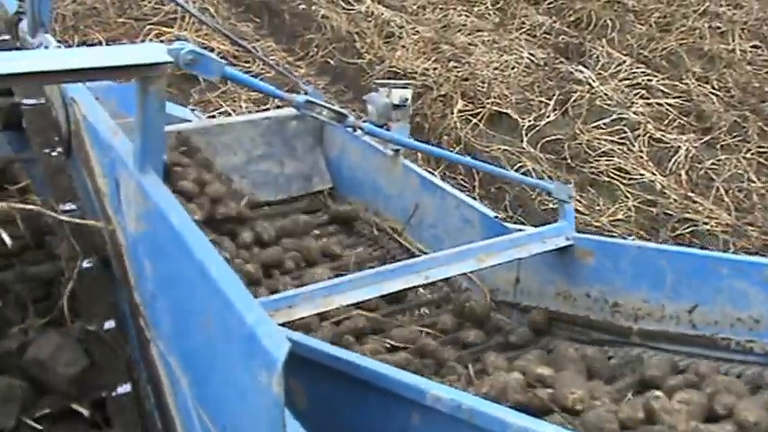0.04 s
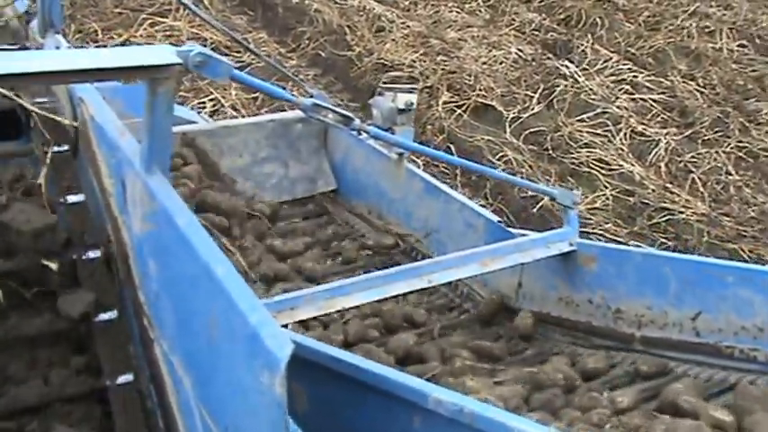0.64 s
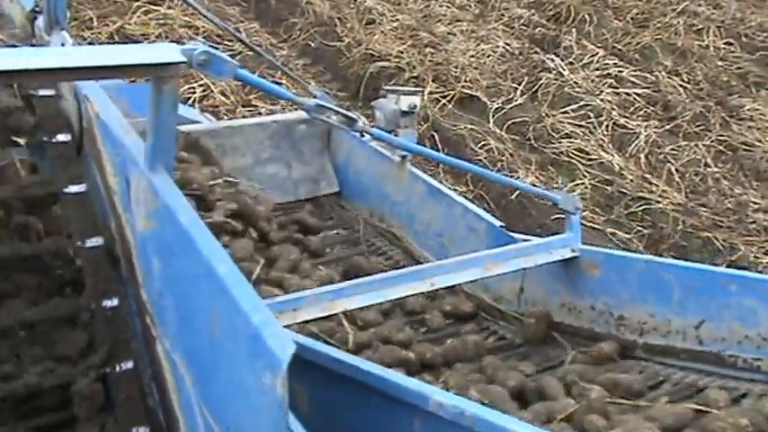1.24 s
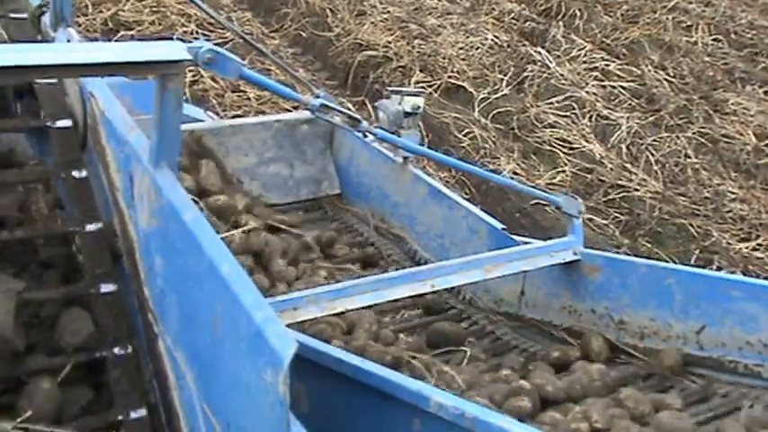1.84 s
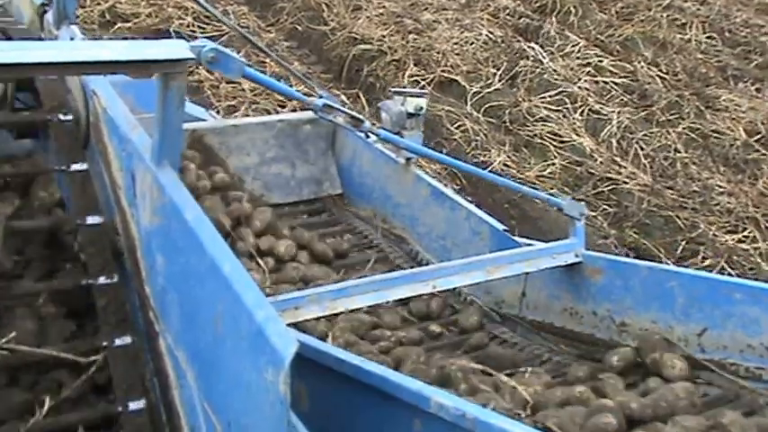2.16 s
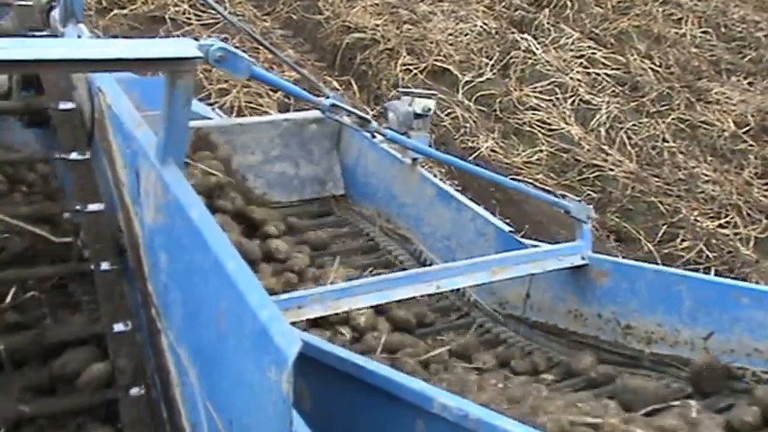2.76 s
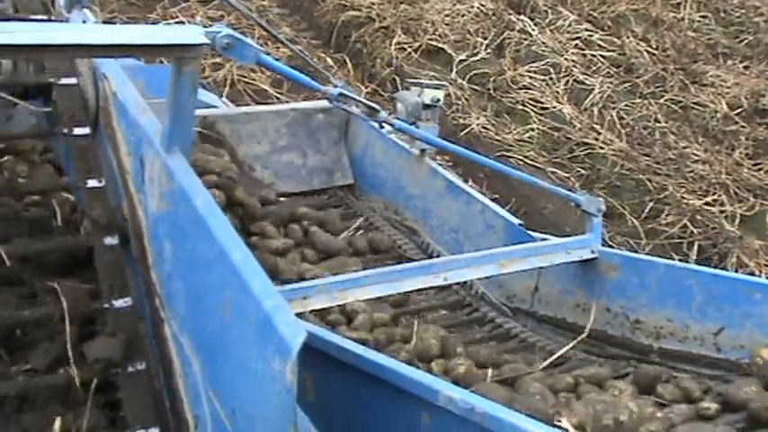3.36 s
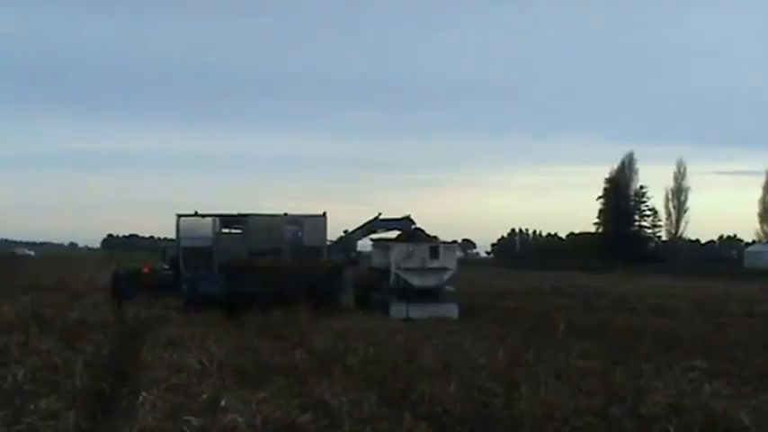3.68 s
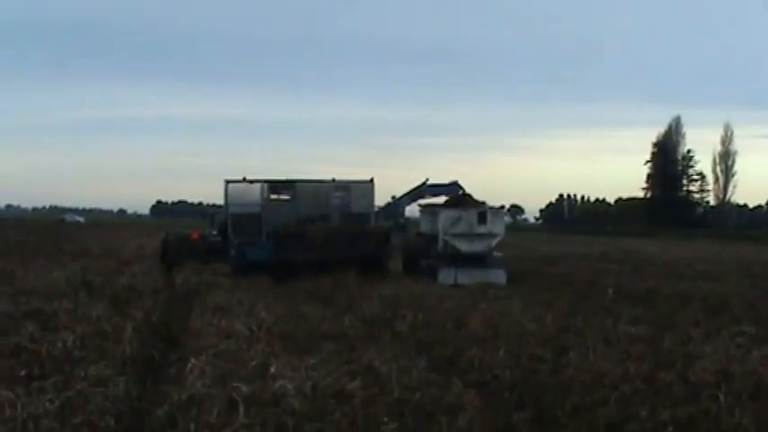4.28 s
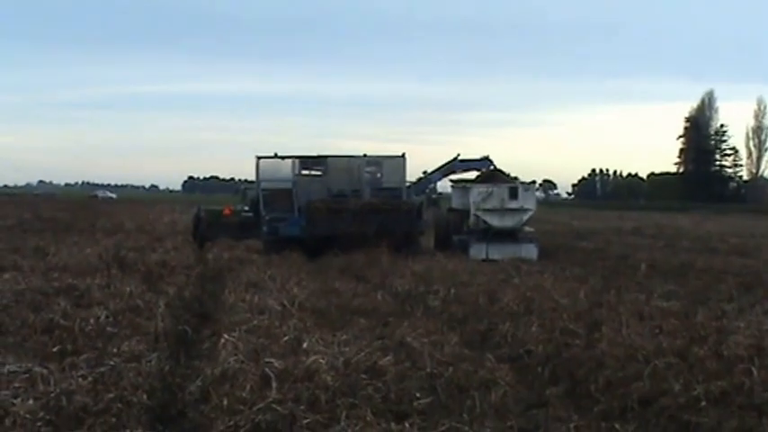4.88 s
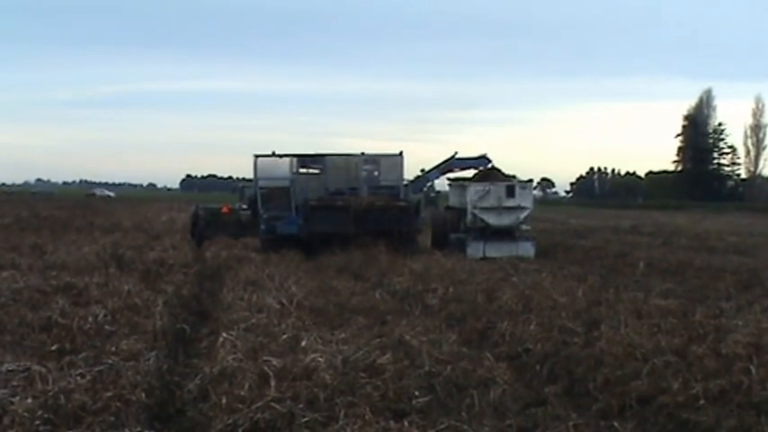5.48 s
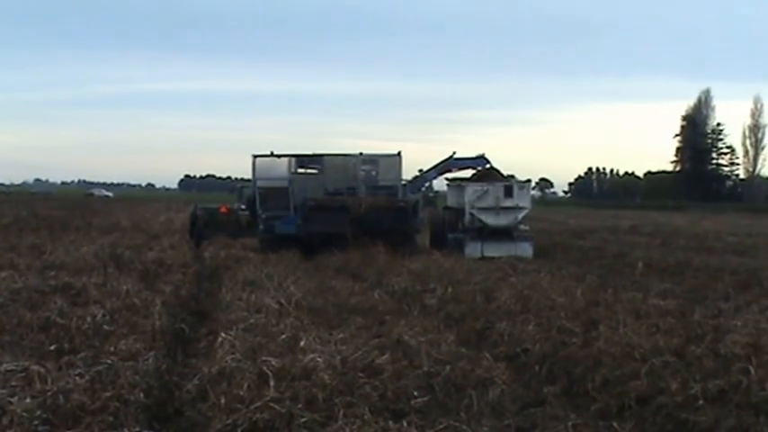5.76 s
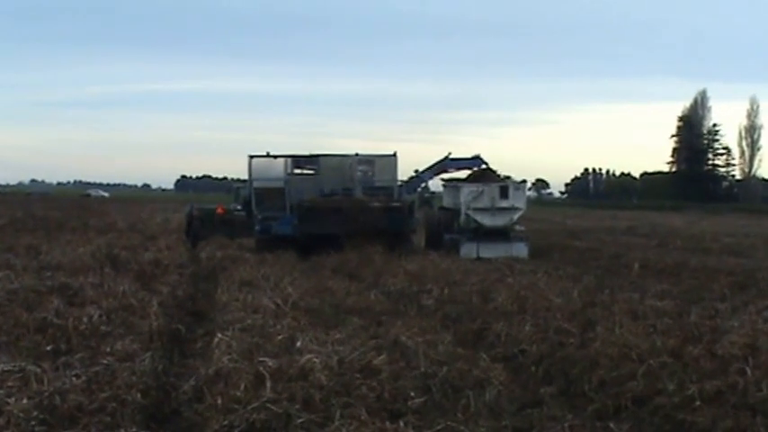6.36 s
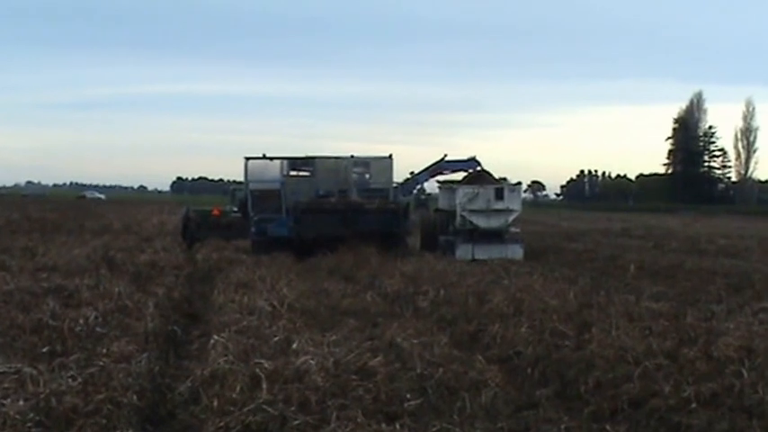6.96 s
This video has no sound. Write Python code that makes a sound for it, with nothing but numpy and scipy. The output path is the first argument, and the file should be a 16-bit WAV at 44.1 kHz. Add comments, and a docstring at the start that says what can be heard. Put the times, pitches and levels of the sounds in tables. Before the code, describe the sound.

A potato harvester works right beside a stereo microphone, its drive humming at a steady pitch while conveyor chains rattle, potatoes and soil tumble and occasional stones ping off metal. This stops abruptly midway, replaced by the far softer drone and clatter of diesel machinery across open farmland. A few thin chirps pass, a second engine sinks in pitch under load, and two small dry ticks sound nearby.

```python
"""A drone and a dense rattle on a potato harvester's deck: the drive sings at multiples of its shaft rate,
two rod chains snap over their sprockets, tubers and clods tumble, and stones ring on steel.
After 3.6 s the scene cuts to the edge of the field: the tractor's exhaust drones far off, a second
engine sinks in pitch under load, and there are a few thin chirps and two small ticks.
A closely spaced stereo microphone hears it all."""
import sys
import numpy as np
from scipy import signal
from scipy.fft import rfft, irfft, next_fast_len
from scipy.io import wavfile
from scipy.ndimage import map_coordinates

SR = 44100
rng = np.random.default_rng(int(sys.argv[2]) if len(sys.argv) > 2 else 0)


def unload_audio(sound):
    """Save the sound as a 16-bit wav file, at the path given as the first command line argument."""
    columns = np.transpose(np.atleast_2d(sound))
    # keep every value between -1 and 1, then stretch to whole-number steps
    steps = np.round(np.clip(columns, -1, 1) * 32767)
    wavfile.write(sys.argv[1], SR, steps.astype(np.int16))


N = 318843
FIRING_HZ = 80.7  # the tractor's engine
# Spectrum of a hard blow on steel: (frequency [Hz], relative density [dB])
STEEL_BLOW = [(1500, -20), (5000, -4), (10000, 3.5), (15000, -4)]


def amp(db):
    """Decibels to amplitude ratio."""
    return 10 ** (np.asarray(db) / 20)


def unit(x):
    """Normalisation to rms 1."""
    return x / np.sqrt(np.mean(x ** 2) + 1e-20)


def along(points, hz):
    """Interpolation of (frequency [Hz], value) points on a logarithmic axis."""
    f, v = np.transpose(points)
    return np.interp(np.log(hz + 1), np.log(f + 1), v)


def envelope(points):
    """Linear interpolation of (time [s], value) points at every sample."""
    return np.interp(np.arange(N) / SR, *np.transpose(points))


def wobble(rate):
    """Smooth random modulation, with rate knots a second."""
    return map_coordinates(rng.standard_normal(int(N * rate / SR) + 4), [np.arange(N) * rate / SR])


def filtered(x, response):
    """Linear filtering: the spectrum of x times a complex frequency response."""
    m = next_fast_len(N + SR // 2)
    return irfft(rfft(x, m) * response(np.fft.rfftfreq(m, 1 / SR)), m)[..., :N]


def noise():
    """Two uncorrelated white noises: the direct and the diffuse part of a sound field."""
    return rng.standard_normal((2, N))


def direct_only(x):
    """A sound field with no diffuse part."""
    return x * [[1], [0]]


def ring(x, modes):
    """Resonance of x in modes of (frequency [Hz], bandwidth [Hz], gain [dB]), at rms 1."""
    response = lambda f: sum(amp(db) * 1j * f * w / (c * c - f * f + 1j * f * w) for c, w, db in modes)
    return unit(filtered(x, response))


def below(f, edge_hz):
    """Power share of the low side of a third-order crossover."""
    return 1 / (1 + (f / edge_hz) ** 6)


def turns(hz):
    """Phase in cycles, the integral of frequency."""
    return np.cumsum(hz) / SR


def bursts(at, scatter_db, t60):
    """Exponentially decaying noise bursts of random size at the given samples, at rms 1."""
    sizes = amp(scatter_db * np.clip(rng.standard_normal(len(at)), -2, 2))
    impacts = np.bincount(at, sizes ** 2, N)[:N]
    power = signal.lfilter([1], [1, -np.exp(-np.log(1e6) / (t60 * SR))], impacts)
    return unit(np.sqrt(power) * noise())


def at_random(rate):
    """A Poisson process: sample numbers of chance contacts, rate a second."""
    return np.flatnonzero(rng.random(N) < rate / SR)


def far_din():
    """Diesel knock and conveyor clatter, dulled by distance, interfere with their ground reflection."""
    # Distant din and open air: (frequency [Hz], relative density [dB])
    din_spectrum = [(200, -20), (290, -10.5), (460, -3), (950, -3.5), (1300, -2), (2000, -3.5),
                    (2550, -9.5), (2800, -11.5), (3700, -17), (5900, -20.5), (8000, -29), (9500, -31),
                    (11000, -36), (15500, -38)]
    # Peaks and notches of the housing: (frequency [Hz], bandwidth [Hz], gain [dB])
    housing = [(453, 46, 5), (786, 140, 3.5), (1310, 120, 2), (1670, 190, -3.5), (2010, 260, 2.5),
               (2260, 160, -4.5), (2440, 130, 6), (5960, 260, 2.5)]
    # Far exhausts: (frequency [Hz], relative density [dB])
    exhaust_spectrum = [(25, -29), (60, -1.5), (105, 1.5), (200, -7.5), (300, -16), (600, -38), (2000, -89)]
    ripple_hz = 649  # spacing of the comb filter's peaks
    firings = np.arange(0, N, SR / FIRING_HZ).astype(int)
    knock = unit(noise() + 0.28 * bursts(firings, scatter_db=5, t60=0.033))
    housing_db = lambda f: sum(db / (1 + (2 * (f - c) / w) ** 2) for c, w, db in housing)
    colour = lambda f: amp(along(din_spectrum, f) + housing_db(f))
    ground = lambda f: 1 + amp(-16) * np.exp(-2j * np.pi * f / ripple_hz)
    clatter = unit(filtered(knock, lambda f: colour(f) * ground(f) * np.sqrt(1 - below(f, edge_hz=220))))
    rumble = unit(filtered(noise(), lambda f: amp(along(exhaust_spectrum, f))))
    return amp(-37.5 + 0.28 * wobble(10)) * clatter + amp(-48 + wobble(9.4)) * rumble


def chirps():
    """Thin frequency glides: harmonics 2, 3 and 4 of a missing fundamental."""
    # Third harmonic: (time [s], duration [s], start [Hz], end [Hz], relative level [dB])
    glides = [(4.057, .014, 4400, 4280, -52), (4.072, .022, 3400, 3450, -50),
              (4.096, .037, 3420, 3290, -45), (4.24, .02, 3450, 3550, -47), (4.285, 0.023, 3540, 3420, -46)]
    out = np.zeros(N)
    for s, length, start_hz, end_hz, db in glides:
        u = np.linspace(0, 1, int(length * SR))
        phase = 2 * np.pi * turns(start_hz + (end_hz - start_hz) * u) / 3
        partials = np.sin(3 * phase) + .85 * np.sin(2 * phase) + .24 * np.sin(4 * phase)
        out[round(s * SR):][:len(u)] += amp(db + 3.5) * np.sqrt(np.abs(np.sin(np.pi * u))) * partials
    return direct_only(out)


def ticks():
    """Dry ticks close by: band-passed noise in fast exponential decay."""
    # Ticks: (time [s], centre frequency [Hz], initial level [dB], 60 dB decay time [s])
    events = [(6.689, 7800, -45, .03), (6.863, 3800, -41, 0.049)]
    out, t = np.zeros(N), np.arange(SR // 8) / SR
    for s, hz, db, t60 in events:
        band = [(hz, .7 * hz, 0)]
        snap = ring(ring(noise()[0], band), band)[:len(t)]
        out[round(s * SR):][:len(t)] += amp(db - 60 * t / t60) * snap
    return direct_only(out)


def tractor():
    """Periodic firing makes the exhaust drone; its lowest tones carry, beside a separate faint hum."""
    # Swell and fade of the fundamental and of its octave: (time [s], relative level [dB])
    fundamental = [(3.7, -41), (3.83, -49.5), (4.69, -42), (5.14, -56), (5.26, -45), (6.26, -52.5),
                   (6.32, -69), (6.69, -55), (7.15, -63)]
    octave = [(3.7, -70), (4.14, -46.5), (4.42, -52), (4.56, -69), (4.84, -47), (5.76, -49), (5.83, -72),
              (6.2, -52), (7.15, -57)]
    # Faint overtones of the exhaust, and a separate faint hum near 234 Hz:
    # (frequency [multiple of the firing rate], rms level [dB])
    tones = [(.5, -66), (2.5, -66), (2.9, -64), (4, -66), (4.5, -65)]
    phase = 2 * np.pi * turns(FIRING_HZ + 0.085 * wobble(1.96))
    drone = amp(envelope(fundamental) + 0.5) * np.sin(phase)
    drone += amp(envelope(octave) + 1.1) * np.sin(2 * phase)
    drone += sum(amp(db + 2.8 * wobble(5.4)) * np.sin(k * phase + 0.36 * wobble(7.1)) for k, db in tones)
    return direct_only(np.sqrt(2) * drone)


def labouring_engine():
    """A second engine booms under load; through inertia its pitch sinks and recovers with a lag."""
    # Spells of load: (time [s], duration [s], rms level of the fundamental [dB])
    pulls = [(3.62, .18, -43.5), (6.082, 1.2, -45.5)]
    free_hz, sag_hz, inertia_s = 80, 20, .35  # firing rate unloaded, drop at full load, time constant
    rise_s, hang_s, fall_s = .24, .19, .13  # the boom builds, outlasts the load, and dies
    out = np.zeros(N)
    for s, length, db in pulls:
        t = np.arange(N) / SR - s
        strain = 1 - np.exp(-np.clip(t, 0, length) / inertia_s)
        strain *= np.exp(-np.maximum(t - length, 0) / inertia_s)
        boom = np.clip(t / rise_s, 0, 1) * np.clip(1 - (t - length - hang_s) / fall_s, 0, 1)
        phase = 2 * np.pi * turns(free_hz - sag_hz * strain)
        out += amp(db) * boom * (np.sin(phase) + amp(-10.5) * np.sin(2 * phase))
    return direct_only(np.sqrt(2) * out)


def drive():
    """Forced vibration: shaft orders flutter with the load, and the shaken frame hums in its modes."""
    # Drive tones: (frequency [multiple of the shaft rate], rms level [dB], flutter [dB])
    orders = [(1, -57, 0), (3, -30, 2.5), (6, -27, 2.5), (9, -22.5, 1), (12, -32.5, 4), (15, -31, -0.5)]
    # Modes of the frame: (frequency [Hz], bandwidth [Hz], gain [dB])
    frame_modes = [(98, 51, -11), (214, 38, -2.5), (464.4, 11, 3.5), (553, 45, -6), (939.4, 12, -1.5),
                   (1224, 52, -3), (1433, 93, -8.5)]
    shaft_hz, hunting_hz = 53.36, .05  # governed speed and the governor's slow drift
    shaft = 2 * np.pi * turns(shaft_hz + hunting_hz * wobble(2.006))
    tones = 0
    for k, db, flutter in orders:
        gain = amp(db + flutter * wobble(7.03))
        tones += gain * np.sin(k * shaft + 0.26 * wobble(10) + rng.uniform(0, 2 * np.pi))
    return direct_only(np.sqrt(2) * tones) + amp(-19) * ring(noise(), frame_modes)


def tumbling_crop():
    """Random impacts merge into noise: tubers and clods thud on the belts, loose panels clatter."""
    # Din of the machine: (frequency [Hz], relative density [dB])
    body_spectrum = [(22, -33), (40, -39), (80, -8), (130, -4), (220, -3), (290, -5), (380, -2.5),
                     (600, -2), (760, -6), (1300, -7), (1850, -10.5), (2400, -8.5), (4000, -17),
                     (8000, -18.5)]
    body = lambda f: amp(along(body_spectrum, f))
    upper_band = lambda f: (1 - below(f, edge_hz=905)) * below(f, edge_hz=7500)
    thuds = unit(noise() + 0.52 * bursts(at_random(60), scatter_db=4, t60=0.074))
    clatter = unit(noise() + 0.44 * bursts(at_random(160), scatter_db=3.5, t60=0.017))
    thuds = unit(filtered(thuds, lambda f: body(f) * np.sqrt(below(f, edge_hz=930))))
    clatter = unit(filtered(clatter, lambda f: body(f) * np.sqrt(upper_band(f))))
    return amp(-18 + 0.74 * wobble(6.4)) * thuds + amp(-17 + 0.19 * wobble(8.26)) * clatter


def stones():
    """Impact excitation: each stone gives a broadband crack and rings one damped mode of the steel."""
    # Strikes: (time [s], relative level [dB], ring frequency [Hz])
    strikes = [(0.1346, -8, 5910), (0.5482, -6.5, 10200), (0.5844, -2.5, 5570), (0.6933, -8, 7600),
               (1.5738, -3, 7220), (1.7499, -6, 9740), (2.3491, -5.5, 9740), (2.7606, -3, 10100),
               (2.826, -7, 6010), (3.0065, -5, 5900), (3.481, -6, 5350), (3.5508, -5, 5250)]
    t60 = .03
    cracks, pings, t = np.zeros(N), np.zeros(N), np.arange(SR // 8) / SR
    for s, db, hz in strikes:
        decay = amp(db - 60 * t / t60)
        cracks[round(s * SR):][:len(t)] += decay * rng.standard_normal(len(t))
        pings[round(s * SR):][:len(t)] += decay * np.sin(2 * np.pi * hz * t)
    cracks = filtered(cracks, lambda f: amp(along(STEEL_BLOW, f)))
    return direct_only(amp(-8.5) * cracks + amp(-10) * pings)


def grit_flow():
    """Amplitude modulation of the chains: grit flows unevenly and swells with each load of soil."""
    # Loads passing the sprockets: (time [s], rise in level [dB])
    surges = [(1.58, 3), (2.18, 3), (2.77, 3)]
    t, swell_s = np.arange(N) / SR, .03
    surge_db = sum(db * np.exp(-((t - s) / swell_s) ** 2) for s, db in surges)
    return amp(-21 + 0.29 * wobble(14) + surge_db)


def chains():
    """Periodic impacts: rods snap over sprockets and crush grit; stray hits ring the rods' modes."""
    # The two chains: (rod rate [1/s], relative level [dB])
    rod_rates = [(53.3, -8.5), (99.4, -5.5)]
    # Modes of the steel rods: (frequency [Hz], bandwidth [Hz], relative level [dB])
    rod_modes = [(5510, 230, 0.5), (7520, 200, 0), (10120, 350, -1.5), (11200, 350, -6), (12600, 300, -11)]
    # Crushed grit: (frequency [Hz], relative density [dB])
    grit_spectrum = [(1000, -22), (2500, 0), (4500, -6), (7000, 0), (10500, -2), (12500, -7.5),
                     (15500, -13)]
    contacts = amp(-6) * bursts(at_random(300), scatter_db=4.5, t60=0.01)
    snaps = clinks = 0
    for rate, db in rod_rates:
        rods_passed = np.floor(turns(rate * (1 + .003 * wobble(3))))
        hits = np.flatnonzero(np.diff(rods_passed))
        contacts += amp(db) * bursts(hits, scatter_db=2.5, t60=0.038)
        snaps += amp(db) * bursts(hits, scatter_db=5.5, t60=0.009)
    for hz, width, db in rod_modes:
        stray_hits = bursts(at_random(160), scatter_db=2.5, t60=0.0082)
        clinks += amp(db) * ring(stray_hits, [(hz, width, 0)])
    crunch = unit(filtered(contacts, lambda f: amp(along(grit_spectrum, f))))
    snaps = unit(filtered(snaps, lambda f: amp(along(STEEL_BLOW, f))))
    return grit_flow() * (amp(-1.06) * crunch + amp(-10.5) * snaps + amp(-7) * unit(clinks))


def microphone(pair, lead, coherence, tilt):
    """Spaced ports: left and right differ in phase and level, and diffuse sound lowers their coherence."""
    angle = lambda f: np.arccos(np.clip(along(coherence, f), 0, 1)) / 2
    direct, diffuse = filtered(pair, lambda f: np.array([np.cos(angle(f)), np.sin(angle(f))]))
    side = np.array([[.5], [-.5]])
    ports = lambda f: amp(side * along(tilt, f)) * np.exp(1j * side * along(lead, f))
    return filtered(np.array([direct + diffuse, direct - diffuse]), ports)


def scene():
    """Superposition of the sources at two places: first the deck, then the edge of the field."""
    # Phase between the ports: (frequency [Hz], lead of the left [rad])
    deck_lead = [(40, .3), (130, 0.67), (300, 1.13), (700, 1.29), (2000, 0.55), (4000, 0.45), (7500, -0.05),
                 (11000, 0)]
    field_lead = [(80, .1), (250, 0.43), (500, 0.81), (1700, 0.8), (2200, .4), (3400, 0.58), (4500, 0.097)]
    # Likeness of the channels: (frequency [Hz], coherence [0-1])
    deck_coherence = [(100, .98), (450, .96), (800, .9), (1300, .9), (4200, .83), (6000, .9), (9000, .89),
                      (12000, .98)]
    field_coherence = [(150, .995), (300, .95), (600, 1), (2300, 0.99), (6000, 0.94), (11000, .78)]
    # Balance: (frequency [Hz], left minus right level [dB])
    deck_tilt = [(100, -1.5), (380, -1), (700, .6), (1200, .9), (4400, 1), (8000, -1.1), (11000, -.9),
                 (13000, 0)]
    field_tilt = [(300, -.4), (1300, .8), (2400, 2.1), (9000, .4)]
    # The deck fades out; the field fades in and later dips briefly: (time [s], gain [ratio])
    deck_fade = [(3.572, 0.94), (3.595, 0.5), (3.607, 0.001)]
    field_fade = [(3.61, 0.011), (3.632, 1), (3.961, 1), (3.964, 0), (3.98, 1)]
    deck = drive() + tumbling_crop() + chains() + stones()
    field = tractor() + labouring_engine() + far_din() + chirps() + ticks()
    deck = microphone(deck, deck_lead, deck_coherence, deck_tilt)
    field = microphone(field, field_lead, field_coherence, field_tilt)
    return deck * envelope(deck_fade) + field * envelope(field_fade)


def record(dry):
    """Soft saturation rounds off the loudest peaks; a steep low-pass limits the band."""
    top_hz = 15850
    rounded = dry / (1 + np.abs(dry) ** 8) ** (1 / 8)
    return filtered(rounded, lambda f: np.clip(.5 + (top_hz - f) / 150, 0, 1))


dry = scene()
out = record(dry)
unload_audio(out)
```